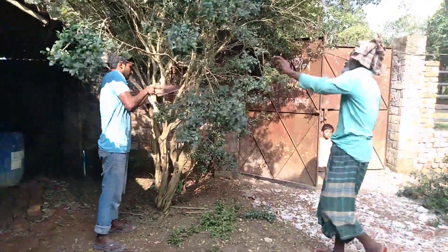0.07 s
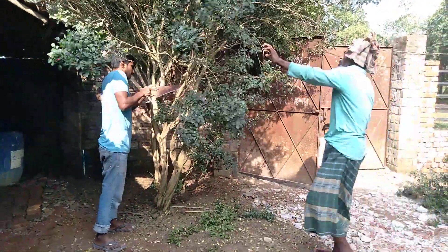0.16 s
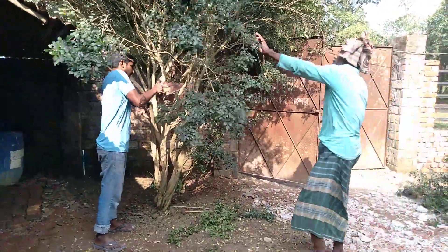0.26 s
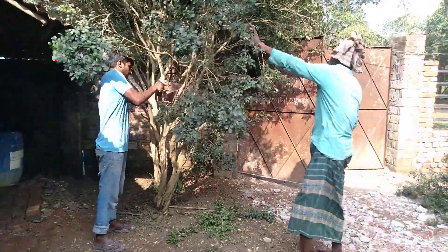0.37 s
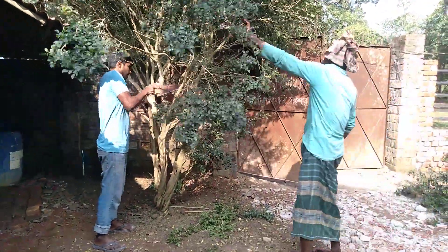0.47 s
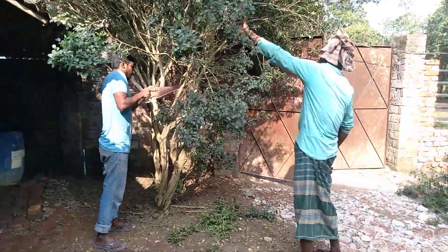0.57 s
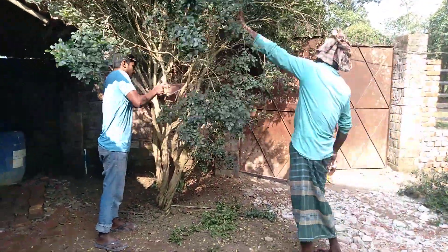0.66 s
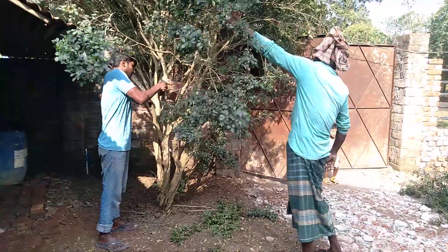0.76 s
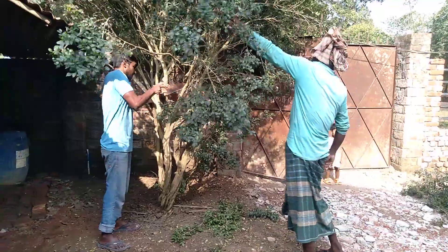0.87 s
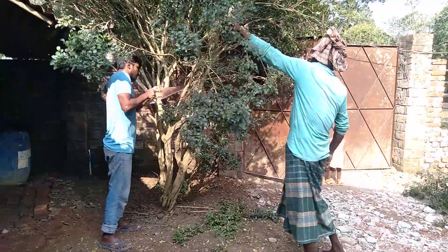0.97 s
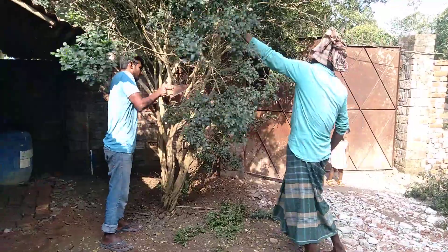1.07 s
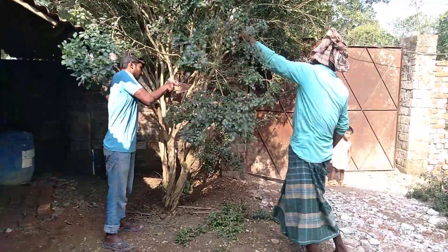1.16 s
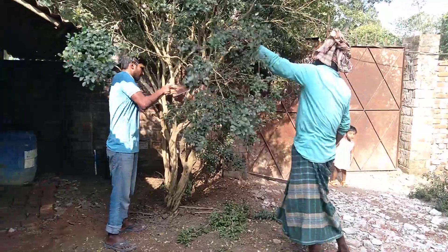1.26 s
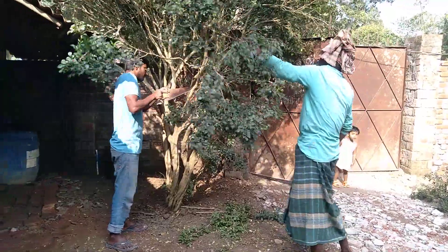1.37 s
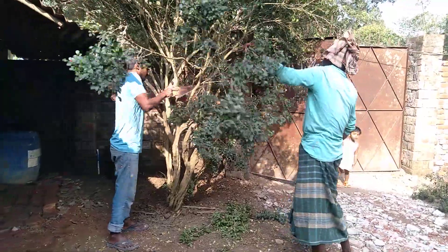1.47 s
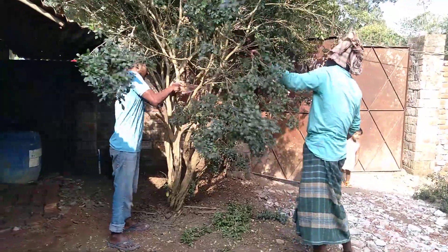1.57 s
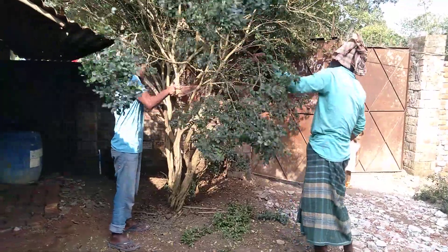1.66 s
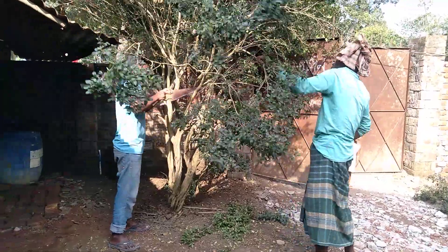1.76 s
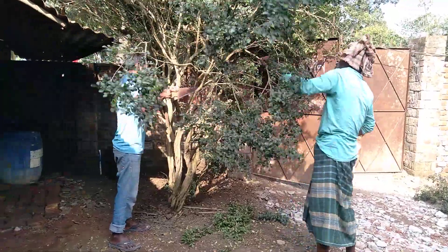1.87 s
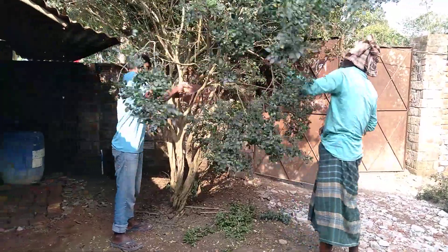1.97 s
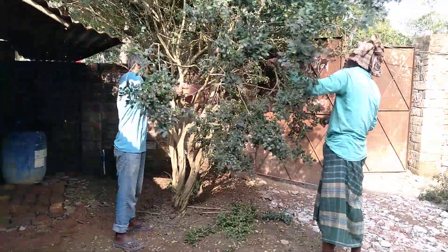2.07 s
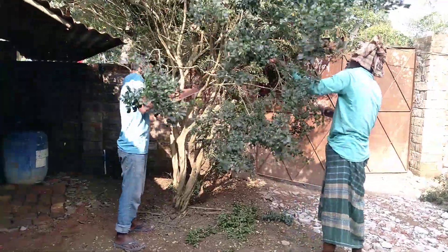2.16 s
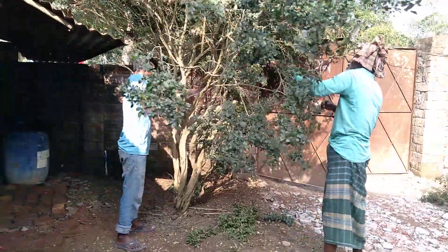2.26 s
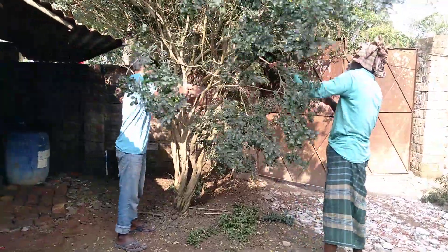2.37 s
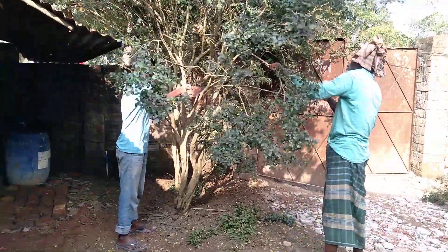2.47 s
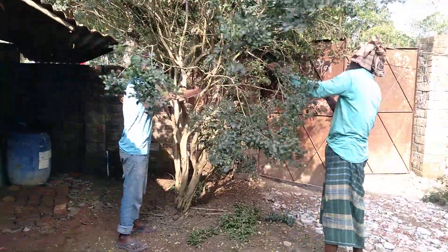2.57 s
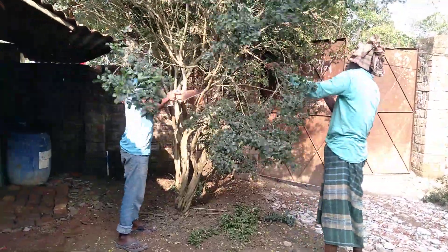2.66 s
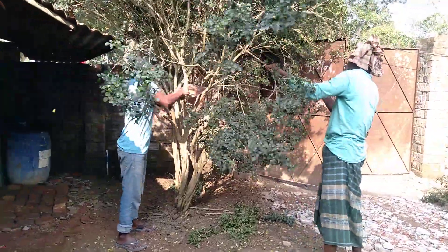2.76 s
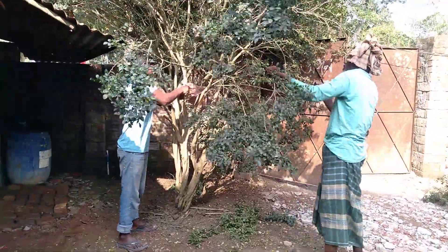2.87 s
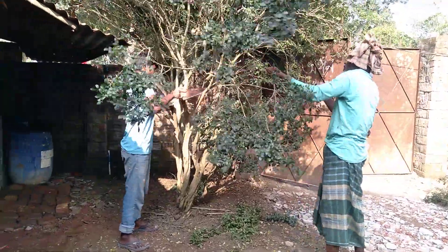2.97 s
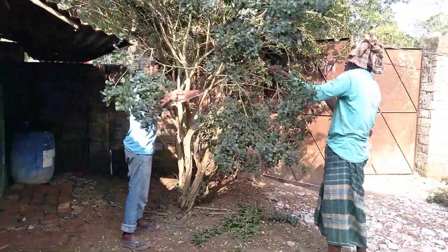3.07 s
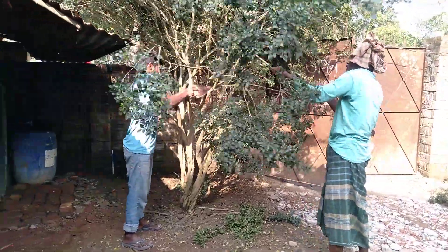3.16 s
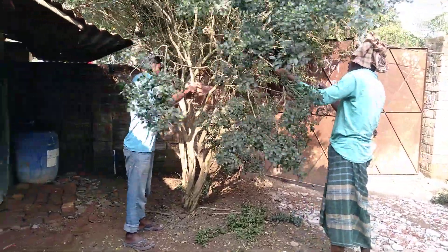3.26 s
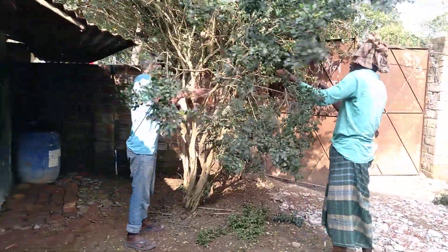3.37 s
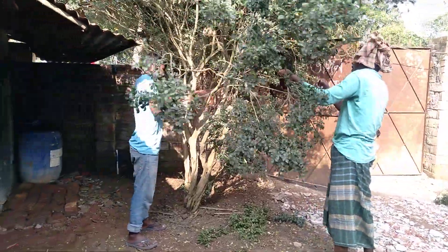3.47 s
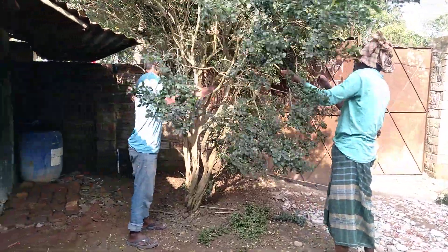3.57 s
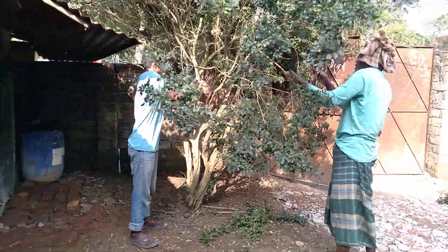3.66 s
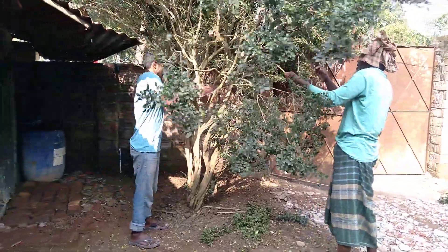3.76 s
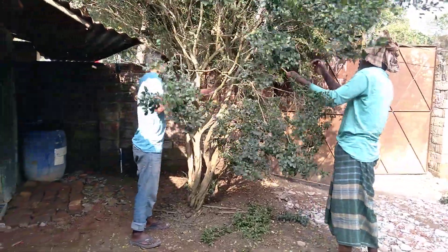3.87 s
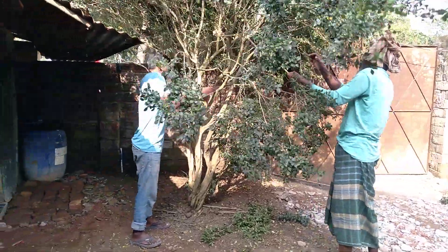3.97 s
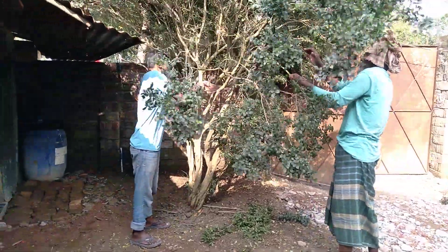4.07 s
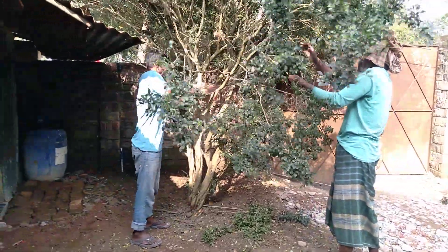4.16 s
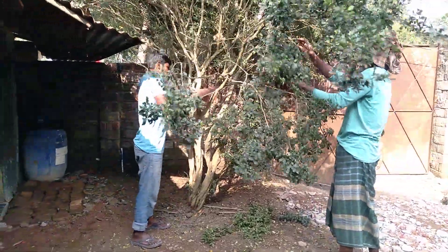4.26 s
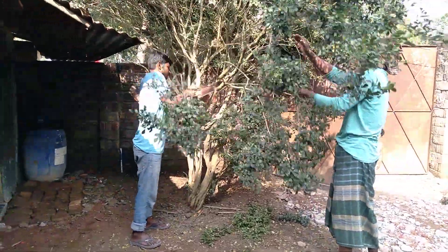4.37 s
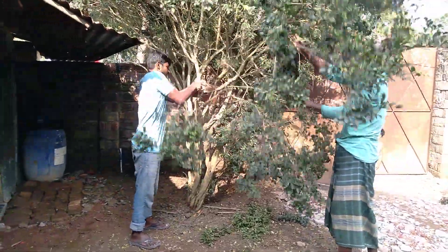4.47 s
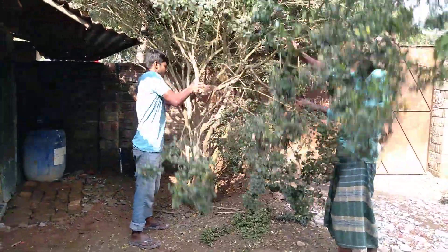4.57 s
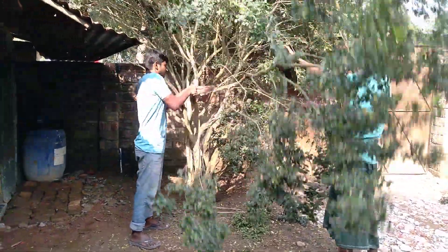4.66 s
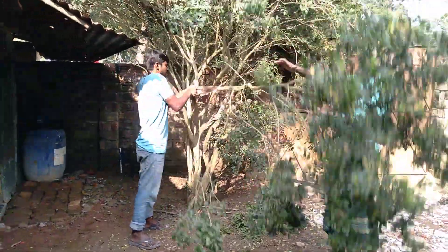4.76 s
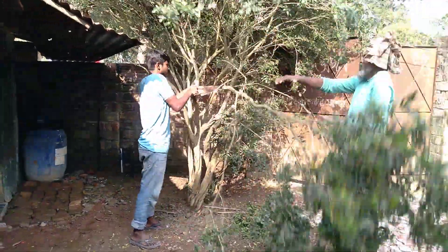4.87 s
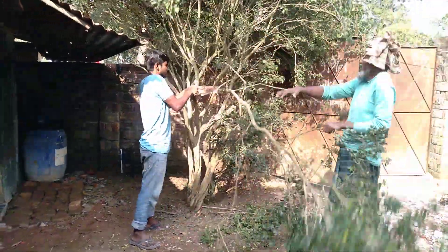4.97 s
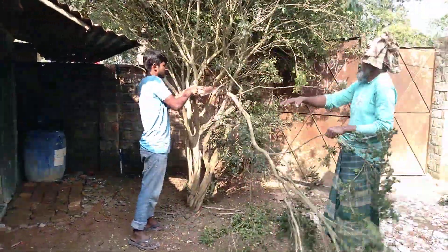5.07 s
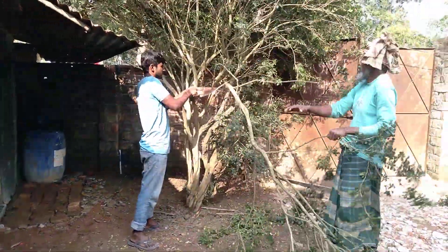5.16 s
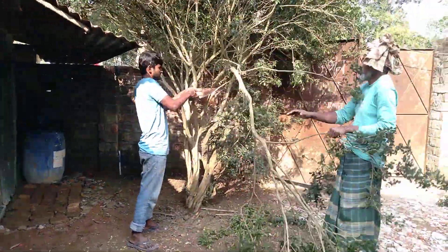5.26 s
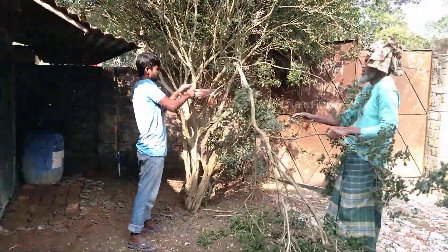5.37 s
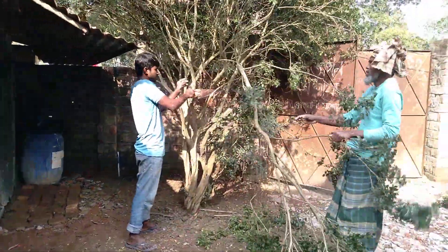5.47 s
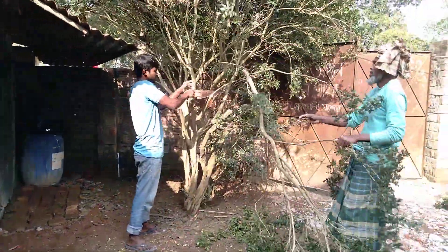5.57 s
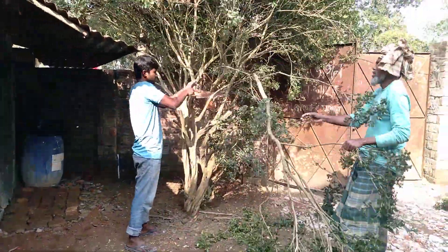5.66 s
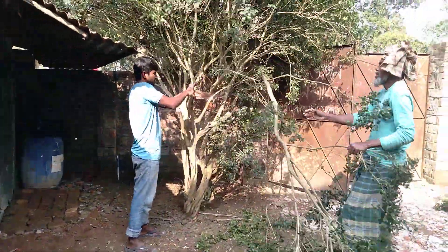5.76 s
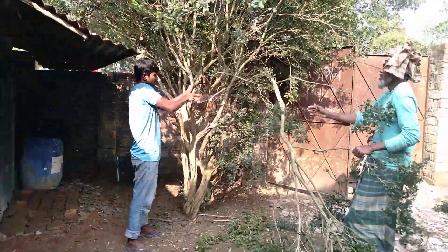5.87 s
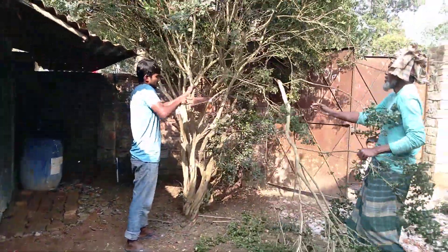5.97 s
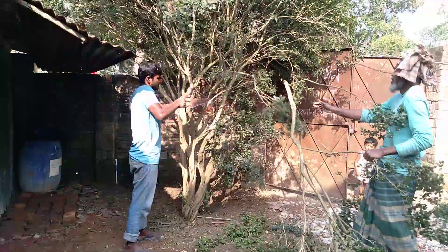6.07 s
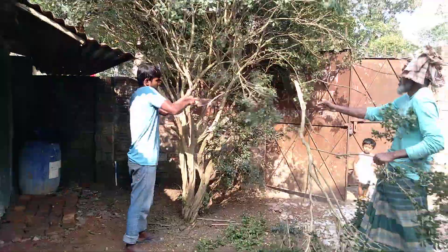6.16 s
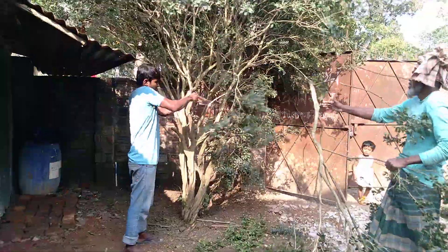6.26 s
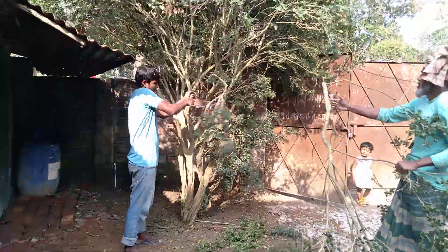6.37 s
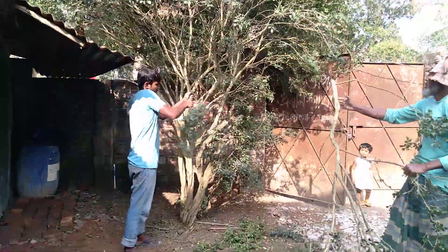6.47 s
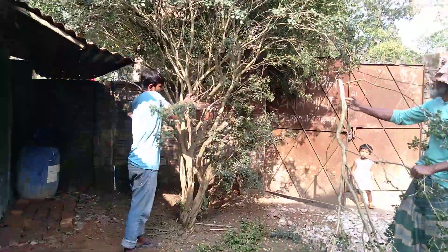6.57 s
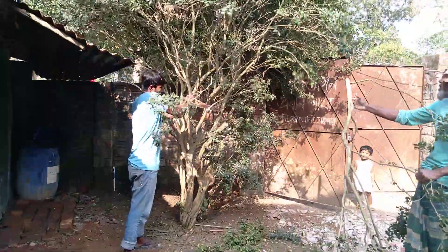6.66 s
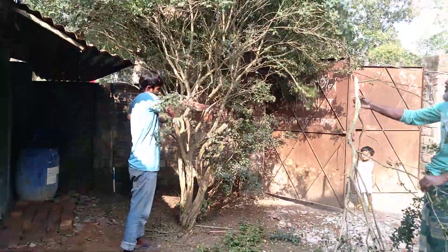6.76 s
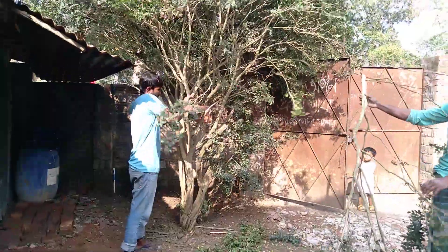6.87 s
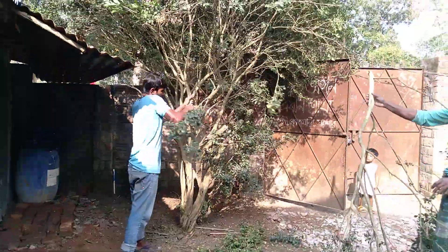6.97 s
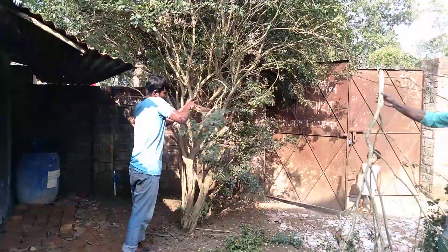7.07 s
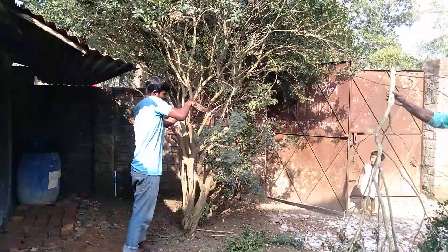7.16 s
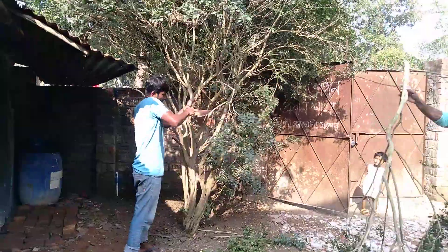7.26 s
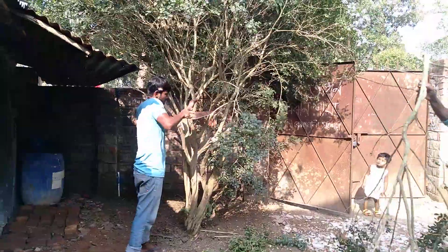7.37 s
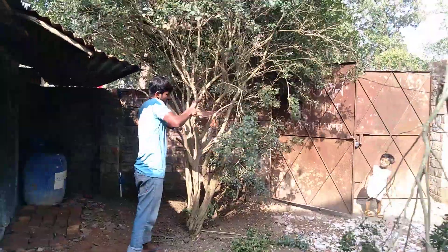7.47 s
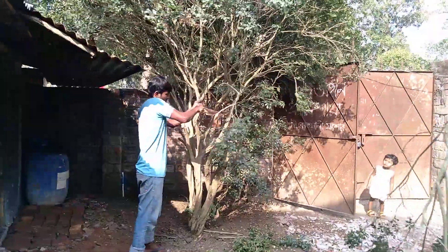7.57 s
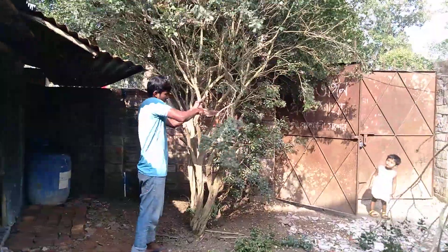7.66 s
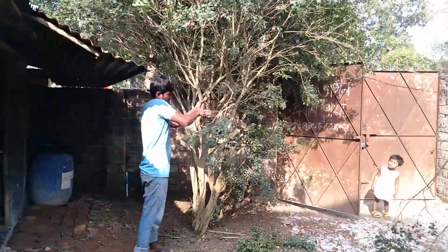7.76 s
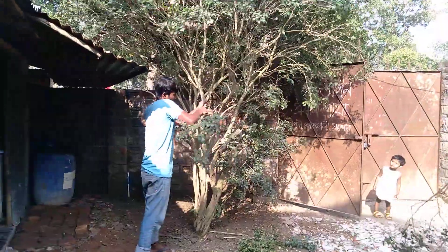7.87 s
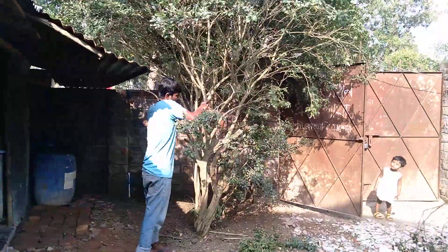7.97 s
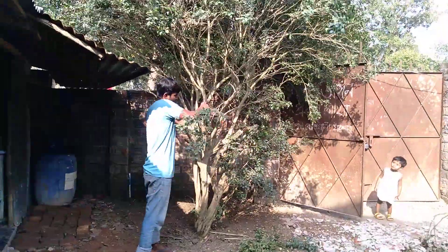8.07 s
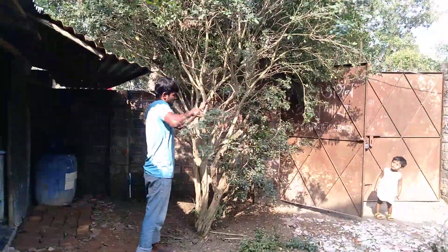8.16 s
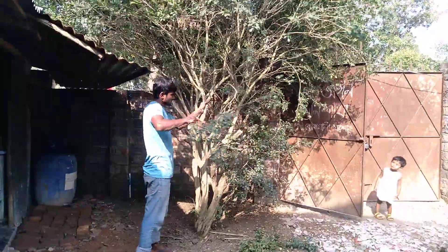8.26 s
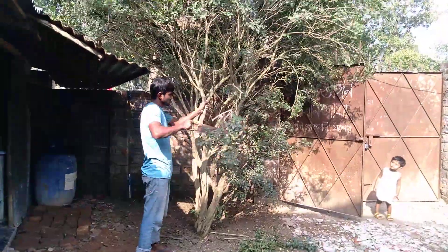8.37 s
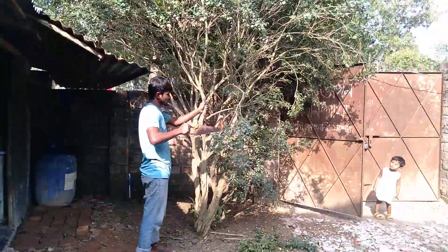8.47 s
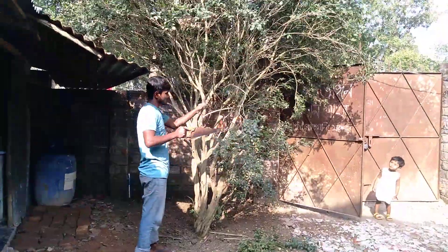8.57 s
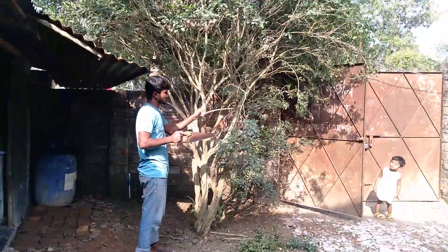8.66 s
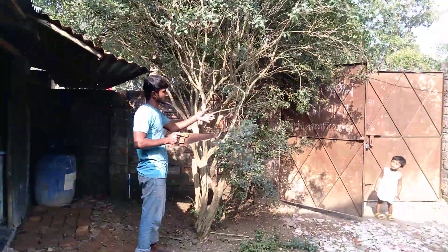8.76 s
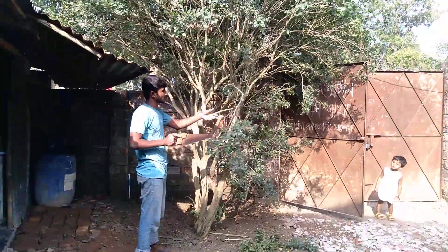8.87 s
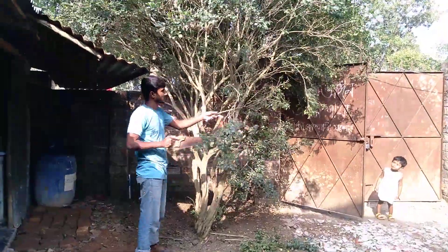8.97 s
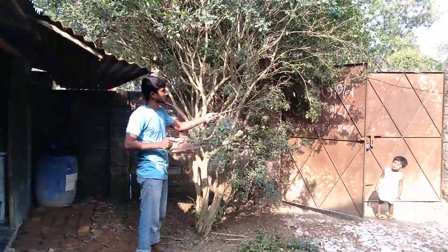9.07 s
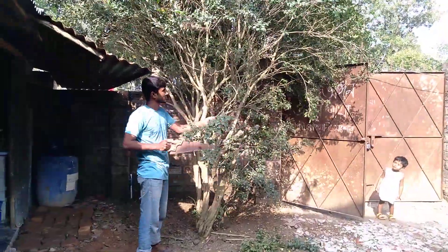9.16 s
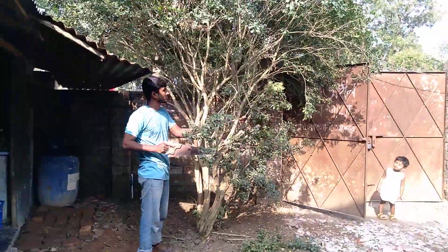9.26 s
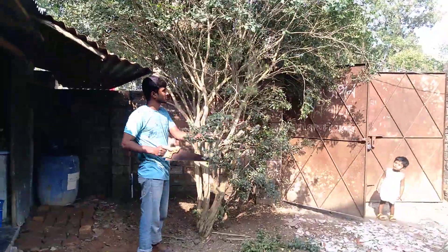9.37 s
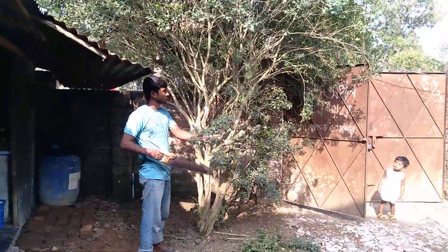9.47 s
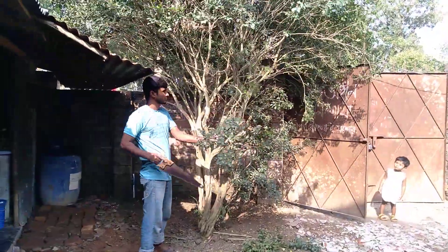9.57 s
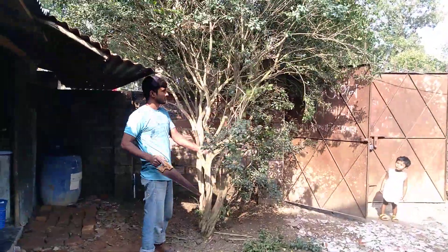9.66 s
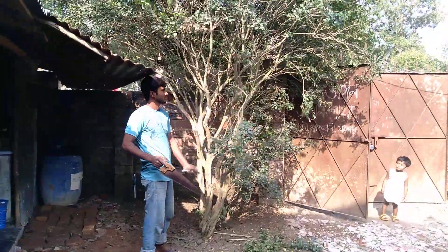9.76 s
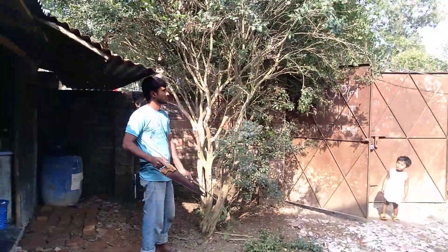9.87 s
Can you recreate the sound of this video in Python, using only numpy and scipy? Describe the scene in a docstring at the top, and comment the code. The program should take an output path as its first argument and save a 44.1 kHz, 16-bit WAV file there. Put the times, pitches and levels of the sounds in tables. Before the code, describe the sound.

From a few metres away in an outdoor yard, a hand saw rasps back and forth through wood, growing stronger as the foliage shakes. The branch splinters with sharp cracks and a soft thud, and its leaves swish and twigs snap as it drops and is pulled aside. Afterwards come scattered trial saw strokes, light knocks and more rustling. Twice a distant bird gives a faint series of low hoots.

```python
"""Foliage rustles in a walled yard as a hand saw cuts a shrub's branch: light pushes, hard rasping pulls.
Teeth tear fibres and shake blade, branch and trunk; from 1.9 s a far bird hoots in a short run.
Near 4.4 s the branch cracks, tears off, falls and is dragged away, leaves hissing and twigs snapping.
From 6 s a few trial strokes scrape the next branch; at 8.8 s the bird starts a second run.
All is heard from a few metres away through a noise suppressor."""
import sys
import numpy as np
from scipy import signal
from scipy.fft import rfft, irfft
from scipy.io import wavfile
from scipy.ndimage import uniform_filter1d

SR = 44100
rng = np.random.default_rng(int(sys.argv[2]) if len(sys.argv) > 2 else 0)


def digitize_waveform(pressure):
    """Quantize a signal to 16-bit integers and store it at the path in sys.argv[1].

    Rows of a 2-D input are taken as channels; values are limited to [-1, 1].
    """
    field = np.atleast_2d(pressure).T
    bounded = np.clip(field, -1, 1)
    quanta = np.round(bounded * 32767).astype(np.int16)
    wavfile.write(sys.argv[1], SR, quanta)


N = 437451
TIME = np.arange(N) / SR

# resonances of the branch and the steel blade: pitch_hz, width_hz, gain_db
BRANCH_MODES = [(627.7, 42.6, -0.5), (740, 104, 2), (869, 157, 2.5), (1015, 193, 2), (1354, 200, 2),
                (1745, 465, -4), (2620, 270, -2)]
BLADE_MODES = [(2347, 25, 27), (2433, 124, 15.5), (2780, 29, -22), (2781, 8.7, -12), (3200, 28, 21),
               (3520, 59, -24), (4120, 30, 9.5), (4400, 13, -10)]
# spectra of trunk, leaves and cracking wood: freq_hz, gain_db
TRUNK_SPECTRUM = [(30, -34), (70, -22.5), (140, -7.5), (220, -2.5), (290, -4), (420, -2.5), (600, -8.5),
                  (1200, -27.5)]
LEAF_SPECTRUM = [(1000, -48), (2000, -35.5), (4000, -15), (5500, -8.5), (7000, -2.5), (8200, -1),
                 (10500, -8), (13000, -9.5), (15500, -5)]
CRACK_SPECTRUM = [(100, -37), (600, -23), (1500, -12.5), (2600, 1), (4300, -0.5), (5800, 0.5), (7700, 2),
                  (10000, -7.5), (15500, -14)]


def undb(db):
    """Decibels to gain."""
    return 10 ** (np.asarray(db) / 20)


def unit(x):
    """Scale to rms 1."""
    return x / np.sqrt(np.mean(x ** 2) + 1e-20)


def along(points, hz):
    """Interpolate (freq_hz, value) points over log frequency."""
    freq_hz, value = np.transpose(points)
    return np.interp(np.log(np.maximum(hz, 1)), np.log(freq_hz), value)


def through(x, response):
    """Convolve with a response scaled to unit energy."""
    return signal.oaconvolve(x, response / np.linalg.norm(response))[:N]


def colour(x, spectrum, size=4096):
    """Minimum-phase filter; keeps the power of white noise."""
    cepstrum = irfft(np.log(undb(along(spectrum, np.fft.rfftfreq(size, 1 / SR)))))
    cepstrum[1:size // 2] *= 2
    cepstrum[size // 2 + 1:] = 0
    return through(x, irfft(np.exp(rfft(cepstrum))))


def ring(x, modes, size=6000):
    """Drive a set of damped resonances."""
    t, response = TIME[:size], 0
    for k, (hz, width_hz, db) in enumerate(modes):
        decay = undb(db) * width_hz * np.exp(-np.pi * width_hz * t)
        response += (-1) ** k * decay * np.sin(2 * np.pi * hz * t)
    return through(x, response)


def resonate(drive, hz, width_hz):
    """Two passes through one resonance; rms 1."""
    b, a = signal.iirpeak(hz, hz / width_hz, fs=SR)
    return unit(signal.lfilter(b, a, signal.lfilter(b, a, drive)))


def walk(rate_hz):
    """Smooth random wander, spread near 1."""
    step = max(int(SR / rate_hz), 1)
    return 1.1 * uniform_filter1d(np.repeat(rng.standard_normal(N // step + 1), step)[:N], step)


def clicks(rate_hz, spread_db):
    """Random clicks of unequal size; rms 1."""
    size = undb(spread_db * np.minimum(rng.exponential(size=N), 5))
    return unit((rng.random(N) < rate_hz / SR) * rng.choice([-1, 1], N) * size)


def burst(start_s, length_s, size=16384):
    """Flat-spectrum burst as (span, samples), with the energy of 10 ms at rms 1."""
    fade = np.exp(-(TIME[:size] / length_s) ** 2)
    spectrum = rfft(rng.standard_normal(size) * fade)
    noise = irfft(spectrum / (abs(spectrum) + 1e-12)) * fade ** 0.12
    noise *= np.sqrt(SR / 100) / np.linalg.norm(noise)
    first = int(start_s * SR)
    return slice(first, first + size), noise[:N - first]


def bursts(rows):
    """One burst per row, summed."""
    out = np.zeros(N)
    for start_s, level_db, length_s in rows:
        span, noise = burst(start_s, length_s)
        out[span] += noise * undb(level_db)
    return out


def air(level_db=-59.5):
    """Faint outdoor noise, wavering in level."""
    spectrum = [(25, -18), (60, 0), (130, -7.5), (300, -3.5), (700, -5.5), (1200, -2.5), (3000, -9.5),
                (15000, -21.5)]  # freq_hz, gain_db
    return undb(level_db) * colour(rng.standard_normal(N), spectrum) * undb(1.26 * walk(12))


def foliage(stem_db=-12, bough_db=-25):
    """Thousands of stiff leaves tick while twigs brush; hard dragging also sounds the wood."""
    levels = [(0.0, -36, -45), (1.9, -34.5, -44), (4.3, -35.3, -43.5), (4.5, -42, -27.5), (4.6, -30.5, -35),
              (4.76, -29.5, -42.5), (4.98, -29, -39.5), (5.02, -23.5, -34), (5.19, -22.5, -31.5),
              (5.26, -26.5, -38.5), (5.46, -30, -40), (5.74, -34.5, -48), (6.8, -35, -48),
              (7.9, -35, -52.5), (8.78, -34.5, -49.5), (8.92, -38, -65), (9.25, -36.5, -58),
              (9.9, -28, -37.5)]  # stirring, fall, drag, settling: time_s, hiss_db, rub_db
    swishes = [(1.1, 0.021, 0.06, -26.5, -39), (6.125, 0.073, 0.036, -30, -38.5),
               (6.2, 0.084, 0.11, -30.5, -34), (7.14, 0.036, 0.18, -34, -43), (7.32, 0.035, 0.18, -31, -38),
               (7.58, 0.13, 0.17, -33, -40), (7.97, 0.025, 0.22, -39.5, -49),
               (8.16, 0.022, 0.12, -26.5, -31), (8.32, 0.034, 0.061, -43, -33.5),
               (9.37, 0.12, 0.2, -32.5, -45.5), (9.795, 0.066, 0.077, -21.5, -34.5)]  # leafy twigs: peak_s, rise_s, fall_s, hiss_db, rub_db
    brush_spectrum = [(400, -58), (1150, -20.5), (1850, -3), (2600, 2), (4000, -1), (6000, -3),
                      (9000, -16.5), (15500, -24)]  # freq_hz, gain_db
    time_s, *curves_db = np.transpose(levels)
    hiss, rub = (undb(np.interp(TIME, time_s, db)) for db in curves_db)
    for peak_s, rise_s, fall_s, hiss_db, rub_db in swishes:
        swell = np.interp(TIME - peak_s, [-rise_s, 0, fall_s], [0, 1, 0])
        hiss = np.hypot(hiss, undb(hiss_db) * swell)
        rub = np.hypot(rub, undb(rub_db) * swell)
    sway = undb(0.8 * walk(14))
    ticks = clicks(7000, 0.9) * undb(walk(60)) * sway * hiss
    scrapes = clicks(5000, 1.6) * undb(0.78 * walk(45)) * sway * rub
    pressure = np.minimum(rub / undb(-42.5), 1)
    drag = scrapes * pressure
    wood = undb(stem_db) * ring(drag, BRANCH_MODES) + undb(bough_db) * colour(drag, TRUNK_SPECTRUM)
    return colour(ticks, LEAF_SPECTRUM) + colour(scrapes, brush_spectrum) + wood


def strokes(first_pull_s=0.323, cycle_s=0.415, push_lead_s=0.186, count=21):
    """Steady pushes and pulls, then hesitant trials; effort counts most on the pull."""
    # strokes at full effort: rise_s, fall_s, teeth_db, wood_db, shudder_db
    push = (0.105, 0.125, -37.5, -42.5, -49.5)
    pull = (0.077, 0.087, -30, -37.6, -41.5)
    effort = [(0.15, -7), (0.75, -5.5), (1.55, -6), (2.0, -0.5), (2.8, -1), (4.1, 0)]  # pressure on the saw: time_s, level_db
    trials = [(5.975, 0.043, 0.25, -44), (6.201, 0.05, 0.14, -37), (7.364, 0.065, 0.15, -43.5),
              (7.586, 0.12, 0.052, -39), (8.18, 0.045, 0.065, -37), (8.344, 0.029, 0.12, -51.5)]  # on the next branch: peak_s, rise_s, fall_s, level_db
    for k in range(count):
        pulling = k % 2
        peak_s = first_pull_s + k // 2 * cycle_s - (0 if pulling else push_lead_s)
        rise_s, fall_s, teeth_db, wood_db, shudder_db = pull if pulling else push
        db = np.interp(peak_s, *np.transpose(effort)) * (1 if pulling else 0.55)
        yield peak_s, rise_s, fall_s, teeth_db + db, wood_db + 0.23 * db, shudder_db + 1.28 * db
    for peak_s, rise_s, fall_s, db in trials:
        yield peak_s, rise_s, fall_s, db, db - 1, db - 3.5


def blade_notes(scrape, low_hz=1100, high_hz=4600, width_hz=70):
    """Four random bending notes of the clamped blade; rms 1."""
    return unit(sum(resonate(scrape, hz, width_hz) for hz in rng.uniform(low_hz, high_hz, 4)))


def saw(nominal_tooth_hz=520, tip_lag_s=0.00091, trunk_lag_s=0.017, flex_hz=715, shudder_hz=254):
    """Teeth catch at a rate set by blade speed; each tears fibres and shakes blade, branch and trunk."""
    rasp_spectrum = [(300, -23), (600, -10.5), (1500, -12.5), (2400, -1), (3300, -1), (5000, -1),
                     (7800, -1), (10500, -11), (15500, -7)]  # freq_hz, gain_db
    speed, rasp, knock, shake, bending, position = np.zeros((6, N))
    for k, (peak_s, rise_s, fall_s, teeth_db, wood_db, shudder_db) in enumerate(strokes()):
        span = slice(int((peak_s - rise_s) * SR), int((peak_s + fall_s) * SR))
        force = np.interp(TIME[span] - peak_s, [-rise_s, 0, fall_s], [0, 1, 0])
        pace = np.sin(force * np.pi / 2)
        speed[span] = np.maximum(speed[span], pace)
        position[span] = (-1) ** k * (np.cumsum(pace) / pace.sum() - 0.5)
        rasp[span] += undb(teeth_db) * (1.35 * force ** 1.54 + 0.075 * np.sqrt(pace))
        knock[span] += undb(wood_db) * pace ** 1.35
        shake[span] += undb(shudder_db) * pace
        # the kerf clamps the blade differently each stroke, shifting the pitches
        blade_hz, branch_hz = np.array([flex_hz, shudder_hz]) * np.exp(0.2 * rng.uniform(-1.21, 1, 2))
        scrape = rng.standard_normal(SR)[:len(pace)]
        bending[span] += undb(wood_db - 9) * pace * resonate(scrape, blade_hz, width_hz=120)
        bending[span] += undb(teeth_db - 8) * pace ** 2 * blade_notes(scrape)
        bending[span] += undb(shudder_db - 7) * pace * resonate(scrape, branch_hz, width_hz=70)
    tooth_phase = np.cumsum(nominal_tooth_hz * (0.2 + speed) * np.exp(0.22 * walk(150))) / SR
    grip = undb(1.5 * walk(170) + 1.15 * walk(45))  # the kerf grabs and lets go
    tearing = unit(np.exp(-(tooth_phase % 1) / 0.47) * clicks(16000, 2.64) * grip)
    # the path to the tip changes as the saw slides, sweeping the colour
    tip_echo = np.interp(TIME - tip_lag_s * (1 + position), TIME, tearing)
    tearing = unit(tearing + 0.34 * tip_echo)
    tooth_onsets = np.diff(np.floor(tooth_phase), prepend=0)
    catches = unit(tooth_onsets * (1 + 0.38 * rng.standard_normal(N)) * grip)
    teeth = undb(2.5) * colour(tearing * rasp, rasp_spectrum)
    blade = undb(-12) * ring(tearing * rasp, BLADE_MODES)
    branch = ring((0.54 * tearing + 0.66 * catches) * knock, BRANCH_MODES)
    trunk = undb(-5) * colour(np.roll(tearing * shake, int(trunk_lag_s * SR)), TRUNK_SPECTRUM)
    return teeth + blade + branch + bending + trunk


def taps(ref_t60_s=0.18, ref_hz=700):
    """A struck stick or blade rings on one note, wavering among the walls; high notes die sooner."""
    strikes = [(.325, 2490, -34), (.53, 637, -36.5), (1.392, 2520, -33.5), (1.828, 727, -38),
               (3.232, 710, -39), (3.745, 4590, -39), (6.18, 668, -30), (6.865, 2510, -44),
               (6.94, 4290, -39.5), (7.32, 2490, -35), (7.378, 892, -36), (7.52, 743, -40),
               (8.155, 2503, -34), (8.175, 228.3, -32.5), (8.315, 706, -42.5), (9.18, 2470, -52)]  # start_s, pitch_hz, level_db
    out, t = np.zeros(N), TIME[:SR // 2]
    for start_s, hz, level_db in strikes:
        t60_s = ref_t60_s * (ref_hz / hz) ** 0.33
        tone = np.sin(2 * np.pi * hz * t) + resonate(rng.standard_normal(len(t)), hz, hz / 8)
        envelope = undb(level_db - 60 * t / t60_s) * (1 - np.exp(-t * hz / 3))
        first = int(start_s * SR)
        out[first:first + len(t)] += envelope * tone
    return out


def thuds():
    """Packed earth takes soft, heavy blows."""
    blows = [(.39, -49, 0.063), (4.42, -41, 0.12), (6.17, -56, 0.07), (7.655, -44, 0.065),
             (9.48, -55, 0.047)]  # start_s, level_db, length_s
    ground_spectrum = [(30, -18), (60, 6), (85, 7), (120, 0), (200, -26), (500, -47)]  # freq_hz, gain_db
    return colour(bursts(blows), ground_spectrum)


def birds(echo_t60_s=0.38, attack_s=0.0088):
    """Far, nearly pure notes sag in pitch; paths among trees and walls make them flutter and linger."""
    lone_calls = [(0.761, 0.088, 316, -51), (0.999, 0.075, 241, -53.5), (4.871, 0.05, 404, -58),
                  (7.805, 0.06, 693, -64), (9.147, 0.085, 686, -59)]  # start_s, length_s, pitch_hz, level_db
    out, t = np.zeros(N), TIME[:SR // 2]
    for start_s, length_s, hz, level_db in hoots() + list(lone_calls):
        pitch_hz = hz * (1 + 0.086 * (np.exp(-t / 0.046) - 0.35))
        swell = np.interp(t, [0, attack_s, attack_s + 1.18 * length_s], [0, 1, 0])
        note = swell * np.sin(2 * np.pi * np.cumsum(pitch_hz) / SR)
        lags_s = rng.uniform(0.01176, 0.11, 14)
        echoes = sum(undb(-60 * lag / echo_t60_s) * np.roll(note, int(lag * SR)) for lag in lags_s)
        call = note + 0.5 * echoes
        call *= np.sqrt(length_s * SR) / np.linalg.norm(call)
        first = int(start_s * SR)
        out[first:first + len(t)] += undb(level_db) * call[:N - first]
    return out * undb(2.2 * walk(60))


def hoots(period_s=0.309, length_s=0.11, opening_hz=323, hz=351.3, sink_hz_per_s=16, fade_db_per_s=4.5):
    """Notes of the hooting bird: a low, soft opener, then an even run that sinks and fades."""
    runs = [(1.935, -44.5), (8.783, -45.5)]  # start_s, level_db
    notes = []
    for start_s, db in runs:
        notes.append((start_s, length_s, opening_hz, db - 7))
        for s in period_s * np.arange(1, 6):
            notes.append((start_s + s, length_s, hz - sink_hz_per_s * s, db - fade_db_per_s * s))
    return [note for note in notes if note[0] < N / SR]


def cracks(blade_db=-17, knock_db=-21, thump_db=-33, ref_length_s=0.019):
    """Fibre bundles break and kick the blade, and later the blade is set down on the next branch; longer events
    move branch and trunk more."""
    breaks = [(1.5026, -23, 0.0029), (1.5275, -20, 0.0037), (4.24, -28, 0.0044), (4.272, -29, 0.0044),
              (4.2795, -9.5, 0.0062), (4.292, -22.5, 0.0094), (4.368, -19.5, 0.0028),
              (4.371, -13.5, 0.0079), (4.408, -5, 0.012), (4.419, -7.5, 0.012), (4.444, -14, 0.024),
              (6.871, -35.5, 0.0087), (7.311, -26, 0.029)]  # breaks, then blade knocks on the next branch: start_s, level_db, length_s
    snap, knock, thump = np.zeros((3, N))
    for start_s, level_db, length_s in breaks:
        span, fibres = burst(start_s, length_s)
        doublings = np.log2(length_s / ref_length_s)
        snap[span] += fibres * undb(level_db)
        knock[span] += fibres * undb(level_db + knock_db + 7 * doublings)
        thump[span] += fibres * undb(level_db + thump_db + 5 * doublings)
    wood = colour(snap, CRACK_SPECTRUM) + ring(knock, BRANCH_MODES) + colour(thump, TRUNK_SPECTRUM)
    return wood + undb(blade_db) * ring(snap, BLADE_MODES)


def twigs():
    """Thin twigs snap and flick against leaves and ground: bright, no body."""
    snaps = [(1.5265, -17.5, 0.0031), (1.659, -27, 0.0024), (4.75, -25, 0.01), (5.071, -27, 0.0085),
             (5.086, -18, 0.0086), (5.157, -18, 0.005), (5.157, -9.5, 0.049), (5.188, -12, 0.0076),
             (5.895, -29, 0.008), (7.13, -28, .014), (7.709, -23, 0.0019), (8.306, -23.5, .004),
             (8.721, -27.5, 0.0016), (8.830, -31, 0.0017), (8.972, -35, .0015), (9.18, -35, .002)]  # start_s, level_db, length_s
    return colour(bursts(snaps), LEAF_SPECTRUM)


def knocks(trunk_db=-8, bark_db=1):
    """Wood bumps wood, or the blade is set down on a branch: bark clacks, the branch rings, the trunk thumps."""
    bumps = [(4.415, -18.5, 0.021), (5.08, -35.5, 0.071), (5.19, -31.5, 0.01), (6.94, -42.5, 0.046),
             (8.306, -38, .008), (8.76, -48, 0.04)]  # start_s, level_db, length_s
    blows = bursts(bumps)
    bark = undb(bark_db) * colour(blows, CRACK_SPECTRUM)
    return bark + ring(blows, BRANCH_MODES) + undb(trunk_db) * colour(blows, TRUNK_SPECTRUM)


def yard(x, wet_db, size=32768):
    """Direct sound plus scattered returns from gate, walls and shed roof."""
    decay_times = [(100, 0.1), (700, 0.68), (2600, 0.21), (6000, 0.39), (14000, 0.54)]  # freq_hz, t60_s
    t, tail = TIME[:size], 0
    noise, hz = rfft(rng.standard_normal(size)), np.fft.rfftfreq(size, 1 / SR)
    octave = np.log2(np.clip(hz, 125, 16000) / 125)
    for k in range(8):
        band = irfft(noise * np.maximum(1 - abs(octave - k), 0))
        tail += band * undb(-60 * t / along(decay_times, 125 * 2 ** k))
    tail *= np.minimum(t / 0.0057, 1) * (1 + np.exp(-t / 0.016))  # soft onset, strong early returns
    response = undb(wet_db) * tail / np.linalg.norm(tail)
    response[0] += 1
    return through(x, response)


def suppress(x, floor_db=-15, size=1024):
    """Noise suppressor: turns down bins whose smoothed power is under the gate."""
    gate = [(100, -99), (250, -73.5), (500, -75.5), (1200, -74.5), (2000, -83), (4000, -74), (6000, -102)]  # freq_hz, threshold_db
    hz, _, frames = signal.stft(x, SR, nperseg=size, noverlap=3 * size // 4)
    power = uniform_filter1d(abs(frames) ** 2, size=3, axis=-1)
    power = uniform_filter1d(power, size=3, axis=-2)
    ratio = (power / undb(along(gate, hz))[:, None] ** 2) ** 2
    gain = np.maximum(ratio / (1 + ratio), undb(floor_db))
    return signal.istft(frames * gain, SR, nperseg=size, noverlap=3 * size // 4)[1][..., :N]


def scene():
    """All sources over outdoor air, the same in both channels."""
    mono = air() + yard(saw(), wet_db=-5.5)
    mono += yard(cracks() + knocks(), wet_db=-2.5)
    mono += yard(foliage(), wet_db=-12.5) + yard(twigs(), wet_db=-5.5)
    mono += taps() + thuds() + birds()
    return np.array([mono, mono])


def record(dry):
    """Hush the quiet gaps, round the peaks, low-pass at 15750 Hz."""
    rounded = 0.8 * np.tanh(suppress(dry) / 0.8)
    return signal.sosfilt(signal.ellip(10, 0.2, 75, 15750, fs=SR, output="sos"), rounded)


dry = scene()
out = record(dry)
digitize_waveform(out)
```